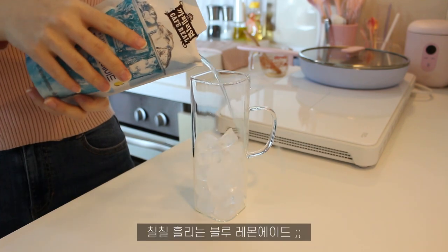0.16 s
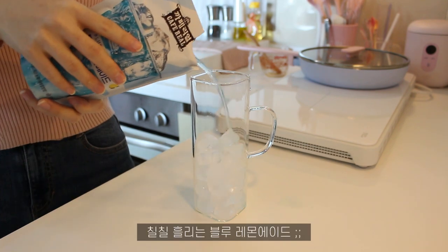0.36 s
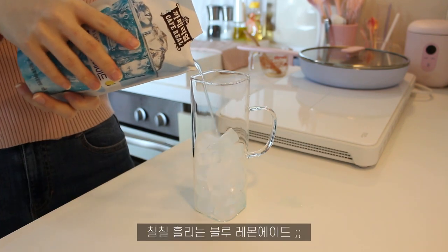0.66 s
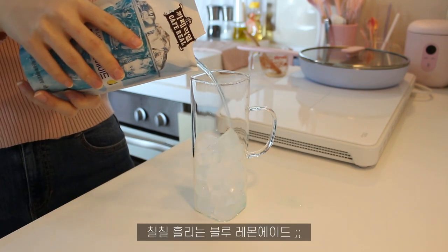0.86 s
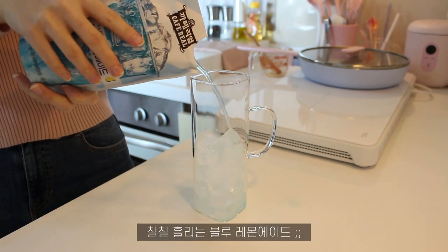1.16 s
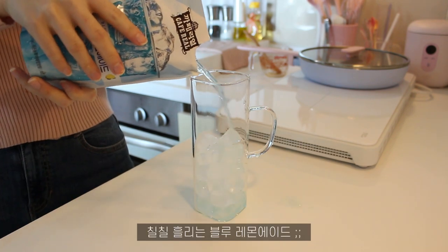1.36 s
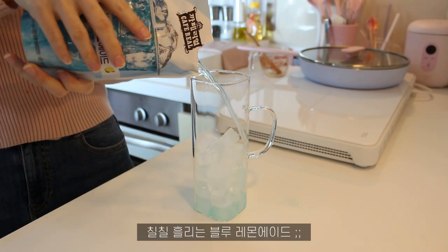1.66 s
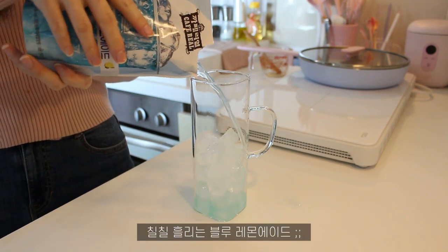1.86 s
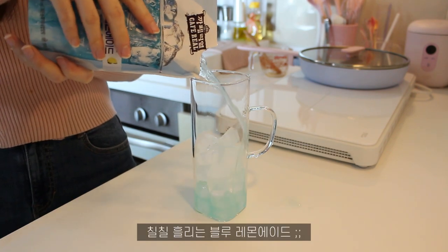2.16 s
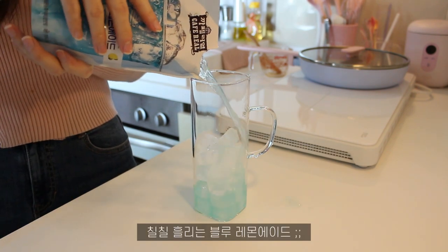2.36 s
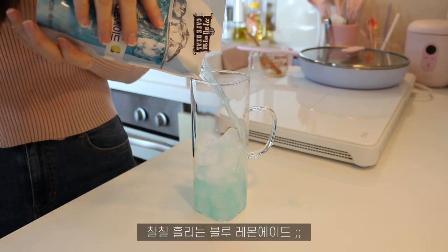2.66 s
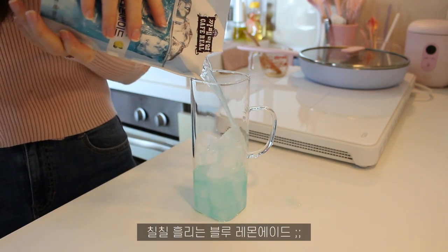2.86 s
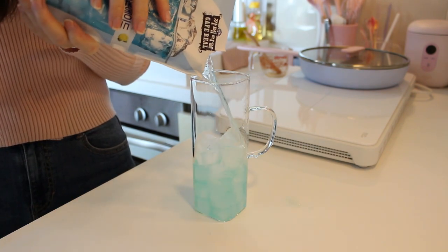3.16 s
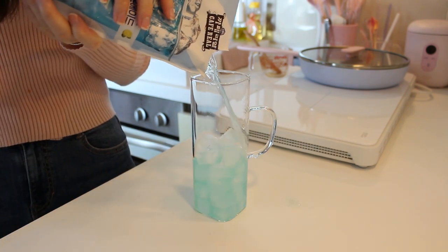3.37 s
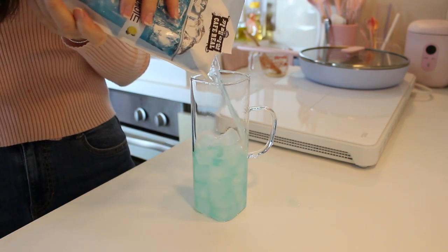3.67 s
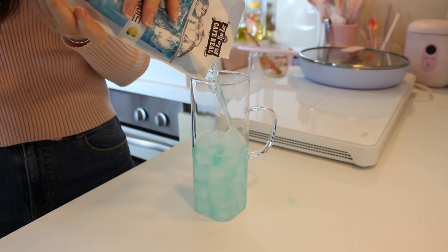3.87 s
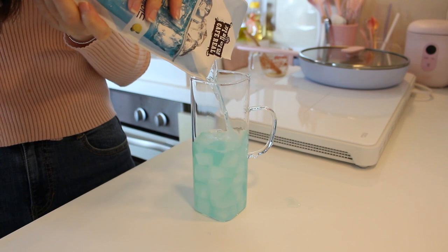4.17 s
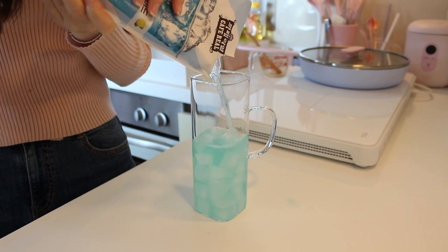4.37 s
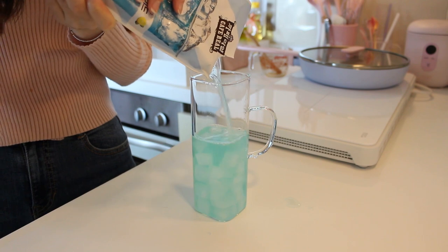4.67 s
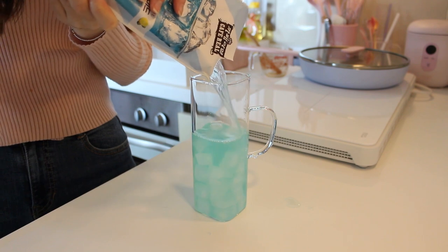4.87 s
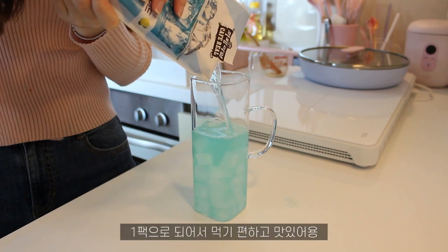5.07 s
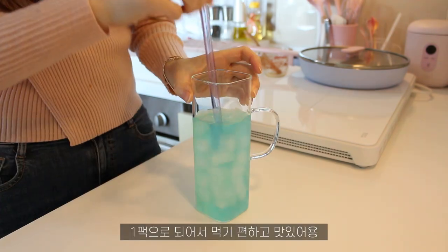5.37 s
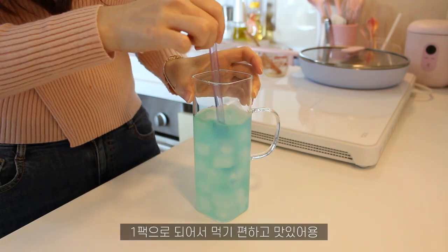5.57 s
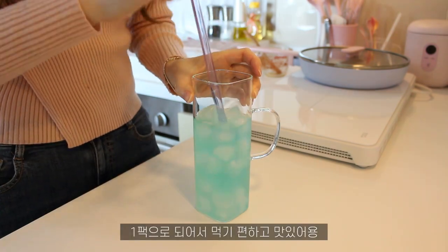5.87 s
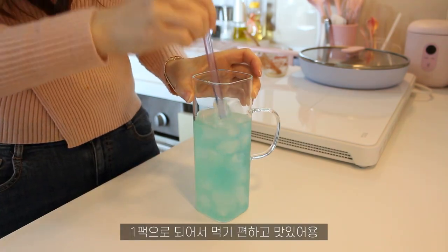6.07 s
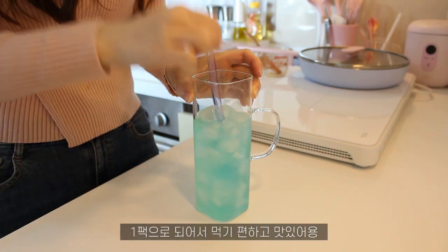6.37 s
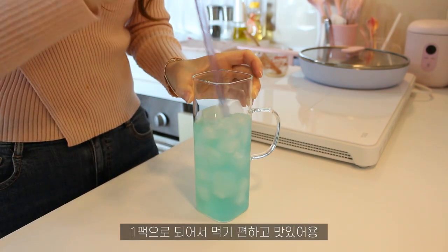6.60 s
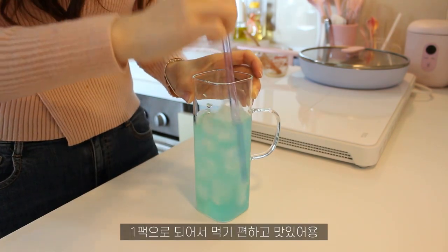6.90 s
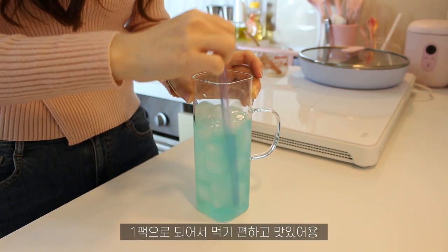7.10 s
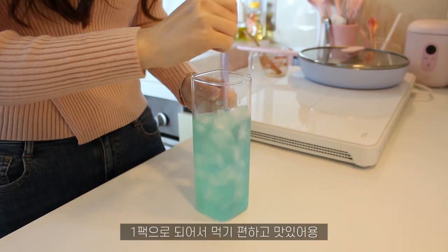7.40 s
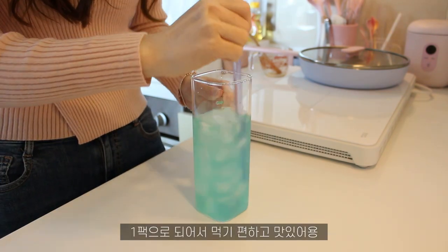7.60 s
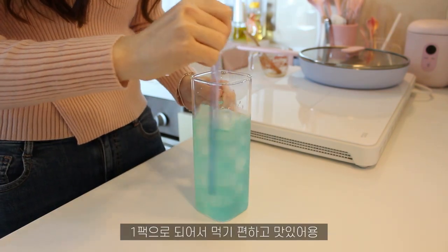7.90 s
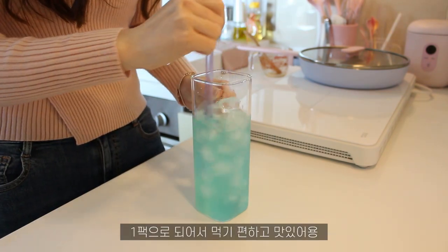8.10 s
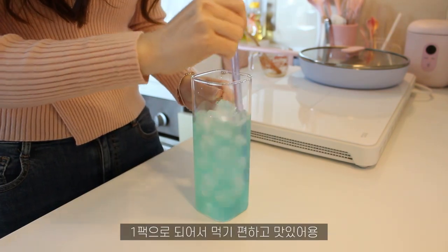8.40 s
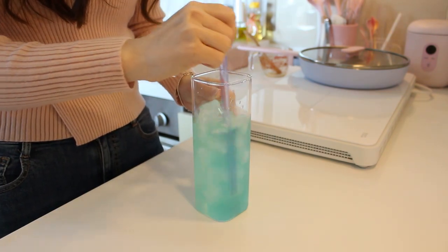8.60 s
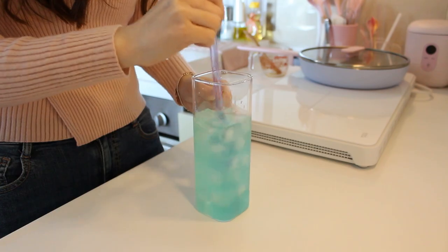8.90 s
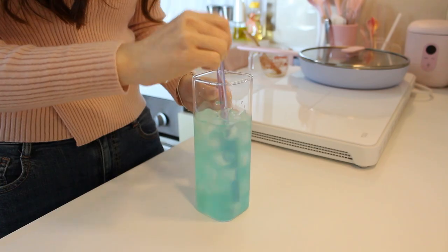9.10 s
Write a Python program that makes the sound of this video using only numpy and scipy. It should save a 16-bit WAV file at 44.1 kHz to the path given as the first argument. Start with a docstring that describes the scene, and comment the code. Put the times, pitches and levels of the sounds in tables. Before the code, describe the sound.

A close, dry kitchen sound with short reflections over a very faint room hush. From 0 to 1.5 s the pour is nearly silent, just tiny bubble plinks and soft ticks. At 1.6 s cubes clack, with a very sharp bright crack at about 1.75 s and a solid clack at 1.95 s. From 2 to 3.4 s trickling, low glugs, drips and several ice snaps cluster; another clack lands at 3.3 s. Until 4.6 s it grows quieter, with a purer gurgling hum climbing in pitch. Hard cube clacks and a last splash come at 4.7 to 5.1 s. From 5.3 s a straw pokes in separate crunchy bursts, knocking at 5.5, 6.1 and 6.3 s, with a bright ringing clink at 6.7 s and a knock at 7.0 s. From 7.25 s continuous swirling gives dense glassy clinks, grinding and light sloshing, cut abruptly near 9.2 s, leaving only hush.

```python
"""Drink poured over ice, then stirred

In a kitchen a drink is poured from a pouch over ice in a tall glass, then stirred with a straw.
Ice cracks, settles and clacks: short noise bursts ring the pieces and the decaying modes of the glass.
Bubbles plink as rising sines; noise-driven resonance of the air above the drink hums ever higher.
The straw then grinds, scrapes and knocks the cubes: filtered crackle, with blows that ring the wall.
Room echoes are noise convolutions; a faint steady room hush lies under all."""
import sys
import numpy as np
from scipy import signal
from scipy.io import wavfile

SR = 44100
rng = np.random.default_rng(int(sys.argv[2]) if len(sys.argv) > 2 else 0)


def log_audio(samples):
    """Write samples as a 16-bit WAV file to the path given in sys.argv[1]."""
    # one column per channel
    frames = np.atleast_2d(samples).T
    # limit to full scale, then quantise
    limited = np.clip(frames, -1, 1)
    pcm = np.round(limited * 32767).astype(np.int16)
    wavfile.write(sys.argv[1], SR, pcm)


N = 407925
TIME = np.arange(N) / SR

# bubbles and drips, before layer gain: start_s, level_db, pitch_hz
DRIPS = [(0.16, -43.5, 1120), (0.285, -37, 4130), (0.603, -33, 5100), (0.7178, -42.5, 2000),
         (0.721, -43, 2540), (0.954, -39, 4200), (1.0058, -42.5, 1090), (1.011, -41.5, 7200),
         (1.084, -43, 4250), (1.2, -47.5, 4220), (1.2285, -39.5, 7340), (1.265, -50, 4200),
         (1.358, -52, 2000), (1.397, -57, 1950), (1.4665, -30.5, 4900), (1.528, -44, 1950),
         (1.536, -40, 4200), (2.082, -32.5, 1170), (2.082, -36, 1910), (2.113, -46, 1140),
         (2.152, -41, 3240), (2.177, -36, 3200), (2.252, -40.5, 1870), (2.298, -28.5, 5020),
         (2.311, -32.5, 3620), (2.371, -38, 1244), (2.403, -38.5, 1274), (2.45, -46, 1480),
         (2.8505, -36.5, 2240), (2.8756, -33, 4400), (3, -31.5, 4700), (3.008, -31.5, 3690),
         (3.256, -29.5, 4260), (3.49, -44, 4000), (3.518, -48.5, 2140), (3.589, -43.5, 2300),
         (3.6596, -34.5, 2990), (3.779, -45, 2290), (3.928, -41.5, 2200), (3.957, -38, 8400),
         (4.0164, -43, 3240), (4.03, -42, 3500), (4.052, -36.5, 3800), (4.175, -42, 2510),
         (4.172, -35.5, 5300), (4.195, -38, 6420), (4.25, -57, 2500), (4.505, -43, 4060)]
# stream running over the ice, before layer gain: time_s, level_db
STREAM = [(0.0, -71), (0.32, -80), (1.49, -73), (1.65, -55), (1.75, -59.5), (2.21, -55.5), (2.62, -63.5),
          (2.86, -53), (2.97, -58), (3.11, -58), (3.24, -56), (3.87, -60.5), (4.27, -68.5), (4.66, -68),
          (4.81, -61), (4.93, -55.5), (5.06, -49.5), (5.25, -67)]
# splash spectrum under the stream: freq_hz, density_db_per_hz
SPLASH_SPECTRUM = [(400, 0.5), (1100, -9), (2200, 9.5), (4000, -1), (7000, -1.5), (11000, -15.5),
                   (16000, -37)]
# straw pushes, before layer gain: start_s, length_s, grinding_db, base_knock_db, counter_rumble_db
PUSHES = [(5.291, 0.035, -56, -44, -59), (5.493, 0.071, -37.5, -38, -48), (5.59, 0.046, -59, -49.5, -73),
          (5.794, 0.043, -40.5, -90, -67), (5.897, 0.053, -42, -56, -59), (6.017, 0.081, -54.5, -44, -52.5),
          (6.178, 0.23, -46.5, -41.5, -71), (6.491, 0.012, -51.5, -81, -62),
          (6.834, 0.047, -44.5, -51, -69), (6.894, 0.17, -39, -43, -76), (7.084, 0.13, -40.5, -54, -62),
          (7.257, 0.18, -43, -50.5, -57), (7.542, 0.18, -44.5, -54, -58), (8.01, 0.29, -44.5, -58, -65.5),
          (8.414, 0.22, -44, -55.5, -56), (8.761, 0.065, -40, -51, -57.5)]
PUSH_START_S, PUSH_LENGTH_S, PUSH_GRIND_DB, PUSH_BASE_DB, PUSH_COUNTER_DB = np.transpose(PUSHES)

TYPICAL_BLOW_DB = -41
LEVEL_WINDOW_S = 0.02   # hit levels are rms over this span
DRIP_RISE = 0.092   # phase bend; a drip's pitch climbs by twice this share over its T60
PUSH_ATTACK_S, PUSH_T60_S = 0.0037, 0.061
DIP_FROM_S, DIP_TO_S = 5.38, 7.25   # the straw dips in and out
SWIRL_FROM_S, SWIRL_TO_S, SWIRL_RISE_S, SWIRL_T60_S = 7.25, 9.08, 0.014, 1
SWIRL_GRIND_DB, SWIRL_SLOSH_DB, SWIRL_BASE_DB, SWIRL_COUNTER_DB = -46.5, -49.5, -60.5, -73


def from_db(db):
    """Decibels to amplitude."""
    return 10 ** (np.asarray(db) / 20)


def rms_one(x):
    """Scale to rms 1."""
    return x / np.sqrt(np.mean(x ** 2) + 1e-20)


def energy_one(x):
    """Scale to energy 1."""
    return x / np.sqrt(np.sum(x ** 2) + 1e-20)


def at_hz(points, hz):
    """Read a table over log frequency."""
    freq_hz, value = np.array(points).T
    return np.interp(np.log(hz), np.log(freq_hz), value)


def gain_curve(rows):
    """A level curve as a gain in time, silent outside its span."""
    time_s, db = np.transpose(rows)
    return from_db(np.interp(TIME, time_s, db, left=-np.inf, right=-np.inf))


def fade(t, t60):
    """Exponential decay, 60 dB down at t60."""
    return np.exp(-np.log(1000) * t / t60)


def swell(start, length, attack, t60):
    """Attack, hold, then a dying release."""
    t = TIME - start
    return np.clip(t / attack, 0, 1) * fade(np.maximum(t - length, 0), t60)


def drift(per_s):
    """Slow chance with a spread of about 1."""
    knots = rng.standard_normal(int(per_s * N / SR) + 2)
    return np.interp(TIME * per_s, np.arange(len(knots)), knots)


def cut(x, hz, kind, order=2):
    """Butterworth filter."""
    sos = signal.butter(order, np.minimum(hz, .47 * SR), kind, fs=SR, output="sos")
    return signal.sosfilt(sos, x + 1e-18)


def bands(lowest_hz):
    """Half-octave bands as (centre, edges)."""
    edges_hz = 22 * 2 ** np.arange(0, 9.9, .5)
    return [(np.sqrt(a * b), [a, b]) for a, b in zip(edges_hz, edges_hz[1:]) if b > lowest_hz]


def resonance(x, hz, width_hz):
    """Two-pole resonance, gain 1 on top."""
    r = np.exp(-np.pi * width_hz / SR)
    zeros = (1 - r * r) / 2 * np.array([1, 0, -1])
    poles = [1, -2 * r * np.cos(2 * np.pi * hz / SR), r * r]
    return signal.lfilter(zeros, poles, x + 1e-18)


def add(track, s, sound):
    """Mix a sound into the track at s seconds."""
    start = max(round(s * SR), 0)
    track[start:start + len(sound)] += sound[:max(N - start, 0)]


def through(x, response):
    """Convolve with an impulse response."""
    return signal.fftconvolve(x, response)[:N]


def random_clicks(per_s, spread_db):
    """Clicks of random size and sign at random moments."""
    sizes = from_db(spread_db * np.minimum(rng.exponential(1, N), 4)) * rng.choice([-1, 1], N)
    return sizes * (rng.random(N) < per_s / SR)


def crackle(spectrum, per_s, spread_db, clump_db, colour_db):
    """Ticks in clumps, each clump with a colour of its own; rms 1."""
    ticks = random_clicks(per_s, spread_db) * from_db(clump_db * np.tanh(drift(45)))
    out = np.zeros(N)
    signs = rng.choice([-1, 1], (2, N))   # neighbouring bands differ in sign pattern
    for k, (hz, edges) in enumerate(bands(300)):
        coloured = ticks * signs[k % 2] * from_db(colour_db * drift(60))
        out += from_db(at_hz(spectrum, hz)) * cut(coloured, edges, "band")
    return rms_one(out)


def bubble(hz, cycles, rise):
    """A ring of some cycles; a bubble's pitch rises as it nears the surface."""
    life = cycles / hz
    t = TIME[:int(life * SR) + 2]
    tone = np.sin(2 * np.pi * hz * t * (1 + rise * t / life))
    return tone * fade(t, life) * (1 - np.exp(-hz * t))


def swarm(spectrum, per_s, low_hz, high_hz, cycles, rise, spread_db):
    """Short rings at random moments and pitches, a few of them strong; rms 1."""
    out = np.zeros(N)
    for when, size, strength in rng.random((int(per_s * N / SR), 3)):
        hz = low_hz * (high_hz / low_hz) ** size
        gain = from_db(at_hz(spectrum, hz) + spread_db * strength ** 3)
        add(out, when * N / SR, gain * bubble(hz, cycles, rise))
    return rms_one(out)


def room_tone(level_db):
    """The faint steady hush of the room: noise shaped in bands."""
    # spectrum: freq_hz, band_gain_db
    hush_spectrum = [(15, -36), (25, -10.5), (97, -6), (249, 1), (451, -14.5), (714, -6.5), (1330, -13),
                     (4610, -20), (11900, -27), (13600, -33.5), (16000, -47)]
    white = rng.standard_normal((2, N))
    hush = np.zeros(N)
    for k, (hz, edges) in enumerate(bands(20)):
        hush += from_db(at_hz(hush_spectrum, hz)) * cut(white[k % 2], edges, "band")
    return from_db(level_db) * rms_one(hush)


def trickle(level_db):
    """Small bubbles ring where the stream runs over the cubes."""
    # bubble strength by pitch: pitch_hz, strength_db
    bubble_strength = [(600, -14.5), (1200, -6), (2200, -4), (3600, 5), (6000, -17), (12000, 1.5)]
    bubbles = swarm(bubble_strength, per_s=380, low_hz=865, high_hz=11780, cycles=100, rise=0.03,
                    spread_db=23.5)
    return from_db(level_db) * gain_curve(STREAM) * bubbles


def spatter(level_db):
    """Soft splashes of shifting colour where the stream breaks on the ice."""
    spray = crackle(SPLASH_SPECTRUM, per_s=5000, spread_db=1.5, clump_db=3, colour_db=7)
    return from_db(level_db) * gain_curve(STREAM) * spray


def ticking(level_db):
    """Tiny splinters tick between the larger cracks while the stream runs."""
    ticks = crackle(SPLASH_SPECTRUM, per_s=45, spread_db=3, clump_db=2, colour_db=6)
    return from_db(level_db) * gain_curve(STREAM) * ticks


def running_stream():
    """Bubbles, splashes and ticks; the low splashing fades as the drink covers the ice."""
    low_db, covered_from_s, low_fade_db_per_s = 3, 2.55, 18.5
    stream = trickle(level_db=-4.0) + spatter(level_db=-6.5) + ticking(level_db=-11.5)
    low_gain = from_db(low_db - low_fade_db_per_s * np.maximum(TIME - covered_from_s, 0))
    return cut(stream, 2500, "high") - low_gain * cut(stream, 940, "low")


def glass_modes(pitch):
    """One decaying sine for each mode of the wall."""
    # filled glass, before the pitch factor: freq_hz, level_db, t60_s
    glass_wall = [(1200, 9, 0.15), (2060, -11, .16), (2250, -8, 0.26), (3350, 1.5, 0.16), (3720, 7, 0.14),
                  (5740, -9.5, 0.18), (5760, -5.5, 0.34), (5920, 10, 0.092), (6700, -0.5, 0.14),
                  (8200, -6.5, 0.13)]
    t = TIME[:SR // 3]
    return np.array([from_db(db) * np.sin(2 * np.pi * hz * pitch * t) * fade(t, t60)
                     for hz, db, t60 in glass_wall])


def ice_hits(rows, pitch, snap, crumble_t60, chips_db, note_db, note_q, thump_hz, thump_t60, ring_db):
    """Each hit snaps, crumbles and sheds chips in its band; it thumps the base and rings the wall."""
    snap_t60_s, contact_rise_s = 0.01, 0.00051   # brief chatter; wet ice takes a moment to bear
    note_loss_per_db = 0.22   # a hard blow holds the piece and damps its note
    out, t, modes = np.zeros(N), TIME[:SR // 4], glass_modes(pitch)
    span = np.sqrt(LEVEL_WINDOW_S * SR)
    for s, db, low_hz, high_hz, note_hz, thump_db, wall_db in rows:
        grains = rng.random(len(t)) < 600 / SR
        chips = energy_one(rng.standard_normal(len(t)) * grains * fade(t, 0.27))
        crumble = energy_one(rng.standard_normal(len(t)) * fade(t, crumble_t60))
        first = energy_one(rng.choice([-1, 1], len(t)) * fade(t, snap_t60_s))
        force = crumble + from_db(chips_db) * chips
        force += first * snap * np.sqrt(1500 / low_hz)   # big pieces knock, small ones splinter
        force *= np.clip(t / contact_rise_s, 0, 1)
        held_db = note_loss_per_db * max(db - TYPICAL_BLOW_DB, 0)
        force += from_db(note_db - held_db) * resonance(force, note_hz, note_hz / note_q)
        force += from_db(-1.0) * resonance(force, 950, 130)   # damped lowest mode of the glass
        wall = from_db(1.9 * rng.standard_normal(len(modes))) @ modes   # each spot favours other modes
        for sound, level_db in ((force, db), (wall, db + wall_db + ring_db)):
            banded = cut(cut(sound, low_hz, "high", order=3), high_hz, "low", order=3)
            add(out, s, span * from_db(level_db) * energy_one(banded))
        base_hz = thump_hz * np.exp(.06 * rng.standard_normal())
        thump = np.sin(2 * np.pi * base_hz * t) * fade(t, thump_t60)
        thump = energy_one(cut(thump, [160, 800], "band", order=3))
        add(out, s, span * from_db(thump_db) * thump)
    return out


def with_ring(blows, ring_db):
    """Append glass ring re the blow; a harder blow presses the cubes on the wall and damps it."""
    loss_per_db = 2
    return [(s, db, *rest, ring_db - loss_per_db * max(db - TYPICAL_BLOW_DB, 0))
            for s, db, *rest in blows]


def settle_hits():
    """Blunt blows of cubes settling as they float free."""
    # before layer gain: start_s, level_db, low_edge_hz, high_edge_hz, piece_note_hz, thump_db
    settles = [(0.1578, -50.5, 600, 650, 760, -70), (0.2871, -51.5, 272, 6800, 506, -66),
               (1.324, -48.5, 810, 825, 1200, -53.5), (1.934, -47.5, 900, 3040, 1060, -75),
               (2.0802, -48, 880, 3700, 1150, -59), (2.7263, -40, 1047, 1060, 1200, -61),
               (2.745, -56, 600, 1500, 845, -54), (2.766, -49.5, 900, 3060, 2340, -57),
               (2.9551, -35, 710, 4330, 2360, -66), (3.022, -61, 700, 2190, 1090, -63),
               (3.061, -49, 600, 1440, 1140, -57.5), (3.2945, -34, 970, 2580, 2260, -75),
               (3.602, -55.5, 503, 1560, 1167, -64)]
    return with_ring(settles, ring_db=-26.5)


def plinks(cycles, splash_db, splash_t60, onset_s, level_db):
    """Drips: a rising bubble swells in softly, inside a small splash of about the same pitch."""
    out, t = np.zeros(N), TIME[:SR // 8]
    for s, db, hz in DRIPS:
        tone = from_db(db + level_db) * bubble(hz, cycles, rise=DRIP_RISE)
        tone = tone * np.clip(TIME[:len(tone)] / onset_s, 0, 1)
        noise = rng.standard_normal(len(t)) * fade(t, splash_t60)
        splash = energy_one(cut(noise, [hz * 0.92, hz * 1.13], "band", order=4))
        add(out, s, tone)
        add(out, s, from_db(splash_db) * np.linalg.norm(tone) * splash)
    return out


def droplets(cycles, count=2):
    """Each drip throws up droplets that fall back just after it, as small bubbles near its pitch."""
    droplet_db, within_s = -13, .06   # level re the drip table
    out = np.zeros(N)
    for s, db, hz in DRIPS:
        for when, size in rng.random((count, 2)):
            ring = bubble(hz * (.7 + .4 * size), cycles, DRIP_RISE)
            add(out, s + when * within_s, from_db(db + droplet_db) * ring)
    return out


def gurgling():
    """Each gurgle is a smooth bump on the faint hum of the stream."""
    # before layer gain: middle_s, length_s, level_db
    gurgles = [(0.301, 0.042, -54), (1.028, 0.042, -57), (1.207, 0.048, -62.5), (2.99, 0.17, -50.5),
               (3.126, 0.077, -51), (3.212, 0.045, -63), (3.703, 0.063, -47), (3.786, 0.055, -49),
               (3.876, 0.022, -58), (4.035, 0.045, -58), (4.188, 0.049, -50), (4.267, 0.01, -46.5),
               (4.397, 0.047, -49.5), (4.584, 0.02, -63.5)]
    hum_from_s, hum_to_s, hum_db, hum_fade_s = 1.8, 5.3, -73.5, 0.12
    bumps = sum(from_db(db) * np.exp(-(2 * (TIME - s) / length) ** 2) for s, length, db in gurgles)
    return bumps + from_db(hum_db) * swell(hum_from_s, hum_to_s - hum_from_s, hum_fade_s, hum_fade_s)


def air_column(damped_width_hz, clear_width_hz, evenness, burst_db, overtone_db, level_db):
    """Bubbling excites the quarter-wave note of the shrinking air space, and faintly its third harmonic."""
    # resonance rising as the glass fills: time_s, pitch_hz
    air_pitch = [(0, 509.6), (1.3, 552.4), (2.502, 660), (3, 744.4), (3.7, 776), (4.04, 780), (4.18, 826),
                 (4.401, 851), (4.799, 899)]
    clear_from_s, clear_takes_s = 3.4, 0.63   # purer as the drink covers the ice that blurs it
    time_s, hz = np.transpose(air_pitch)
    phase = 2 * np.pi * np.cumsum(np.interp(TIME, time_s, hz)) / SR
    bubbling = rng.standard_normal(N) + 1j * rng.standard_normal(N)
    bubbling = bubbling * from_db(burst_db * drift(50))
    clear = np.clip((TIME - clear_from_s) / clear_takes_s, 0, 1)
    damped_swing = cut(bubbling, damped_width_hz, "low") / np.sqrt(damped_width_hz)
    clear_swing = cut(bubbling, clear_width_hz, "low") / np.sqrt(clear_width_hz)
    swing = (1 - clear) * damped_swing + clear * clear_swing
    size = np.abs(swing)
    swing = swing / (size + 0.27 * size.mean()) ** min(evenness, 1)   # evens out the level
    note = rms_one(np.real(swing * np.exp(1j * phase)))
    overtone = rms_one(np.real(cut(bubbling, 3 * clear_width_hz, "low") * np.exp(3j * phase)))
    return from_db(level_db) * gurgling() * (note + from_db(overtone_db) * overtone)


def crack_hits():
    """Bright cracks as the drink warms the ice; smaller splinters lift both band edges."""
    # before layer gain: start_s, level_db, low_edge_hz, piece_note_hz
    cracks = [(0.5116, -64.5, 2600, 10100), (0.832, -63, 6330, 7200), (1.372, -68, 3410, 12450),
              (1.568, -44, 1210, 4320), (1.7604, -23.5, 3600, 6520), (2.2214, -35.5, 2900, 3400),
              (2.23, -42.5, 3100, 4460), (2.6717, -40, 2100, 3900), (2.7875, -49.5, 3630, 3700),
              (2.9115, -29, 1580, 3620), (3.1072, -37, 2380, 3760), (3.1651, -32, 5270, 7650),
              (3.377, -34.5, 2750, 3700), (3.5645, -42, 3430, 9000), (3.695, -32.5, 3600, 3520),
              (3.722, -39.5, 2140, 3950), (4.407, -41.5, 4060, 9500), (4.5768, -33.5, 4730, 5800),
              (5.062, -51.5, 5500, 6350), (4.7202, -31, 2920, 6860)]
    typical_low_hz, typical_top_hz, top_follows = 2990, 12100, 0.11
    thump_db, ring_db = -47, -18.5   # re the crack, before layer gain
    rows = []
    for s, db, low_hz, note_hz in cracks:
        top_hz = typical_top_hz * (low_hz / typical_low_hz) ** top_follows
        rows.append((s, db, low_hz, top_hz, note_hz, db + thump_db, ring_db))
    return rows


def glugs(level_db):
    """Larger pockets of air ring low as the stream traps them between the bare cubes."""
    # pocket strength by pitch: pitch_hz, strength_db
    pocket_strength = [(600, -9), (800, -10.5), (1050, -3), (1270, 10), (1600, -9), (1950, 12), (2400, -16),
                       (3200, -11)]
    # churning between bare cubes and after one has tipped, before layer gain: time_s, level_db
    churn = [(1.59, -8), (1.66, -1), (1.78, -8), (1.9, -22), (1.98, -3.5), (2.1, -8), (2.2, -8), (2.37, -4),
             (2.47, 0), (2.63, -13), (2.76, -7), (2.86, -18), (3.05, -9), (3.17, -20)]
    pockets = swarm(pocket_strength, per_s=400, low_hz=600, high_hz=3200, cycles=46, rise=0.053,
                    spread_db=9)
    return from_db(level_db) * gain_curve(churn) * pockets


def clacks(chatter_db, chatter_t60, wash_db, wash_t60, note_q, spreading, thump_hz, thump_t60,
           level_db, count=10):
    """A tipping cube's clean contact rings it and the damped wall; it chatters, then drink washes back."""
    # before layer gain: start_s, level_db, low_edge_hz, high_edge_hz, cube_note_hz, note_db, thump_db
    blows = [(1.5956, -32.5, 390, 3670, 2980, -4.5, -45), (1.941, -25, 896, 3400, 3200, -9, -43),
             (2.515, -34, 590, 3200, 720, -1, -61), (3.3097, -27.5, 451, 12800, 806, 4, -54),
             (4.7262, -26, 1350, 8390, 5760, 0, -74.5), (4.8055, -19, 1300, 4400, 1790, 11, -74),
             (4.8911, -27, 770, 847, 850, 1, -40), (4.9475, -21, 623, 5200, 5350, -8.5, -46.5),
             (6.2814, -31, 800, 5560, 1160, 14.5, -56), (6.318, -21, 910, 5500, 3400, -7.5, -41.5),
             (7.0142, -27.5, 850, 6900, 1910, 5, -45.5)]
    # damped wall with a cube pressed against it: freq_hz, width_hz, level_db
    pressed_wall = [(1072, 200, -0.8), (1490, 76, -1.0), (1965, 610, -3), (2537, 340, -2),
                    (3430, 550, -6.5), (4710, 440, -6), (4940, 320, -6.1), (10033, 8300, -8.5)]
    out, t = np.zeros(N), TIME[:SR // 4]
    span = np.sqrt(LEVEL_WINDOW_S * SR) * from_db(level_db)
    lag = np.clip(spreading, 0, .85)
    for s, db, low_hz, high_hz, note_hz, note_db, thump_db in blows:
        chatter = energy_one(rng.standard_normal(len(t)) * fade(t, chatter_t60))
        grains = rng.random(len(t)) < 900 / SR
        wash = energy_one(rng.standard_normal(len(t)) * grains * fade(t, wash_t60))
        wash_gain = from_db(wash_db - .4 * (db - TYPICAL_BLOW_DB))
        force = (t == 0) + from_db(chatter_db) * chatter + wash_gain * wash
        for _ in range(count):   # low bending waves travel slower, which spreads the click
            force = signal.lfilter([-lag, 1], [1, -lag], force + 1e-18)
        body = from_db(note_db) * resonance(force, note_hz, note_hz / note_q)
        for k, (hz, width_hz, mode_db) in enumerate(pressed_wall):
            body += (-1) ** k * from_db(mode_db) * resonance(force, hz, width_hz)
        body = cut(cut(body, low_hz, "high", order=4), high_hz, "low", order=3)
        thump = np.sin(2 * np.pi * thump_hz * t) * fade(t, thump_t60)
        thump = cut(thump, [150, 600], "band", order=3)
        add(out, s, span * from_db(db) * energy_one(body))
        add(out, s, span * from_db(thump_db) * energy_one(thump))
    return out


def stirring(levels_db, t60, swirl_db):
    """Each push swells and dies away, on top of the drifting and then swirling contents."""
    # cubes drifting while the straw dips, twice coming to rest: time_s, level_re_swirl_db
    drift_levels = [(5.38, -21.5), (5.46, -10.5), (5.64, -26), (5.68, -40), (5.78, -42), (5.8, -12),
                    (6.55, -24.5), (6.68, -15.5), (6.75, -7), (7.25, -34)]
    pushes = sum((from_db(db) * swell(s, length, PUSH_ATTACK_S, t60)) ** 2
                 for s, length, db in zip(PUSH_START_S, PUSH_LENGTH_S, levels_db))
    drifting = from_db(swirl_db) * gain_curve(drift_levels)
    # stirred in circles, the contents keep turning between pushes
    swirl = swell(SWIRL_FROM_S, SWIRL_TO_S - SWIRL_FROM_S, SWIRL_RISE_S, SWIRL_T60_S)
    return np.sqrt(pushes + drifting ** 2 + (from_db(swirl_db) * swirl) ** 2)


def grinding(ring_db, tick_db, note_db, level_db):
    """Cubes rub and tick on each other, some with a brief note, and keep the wall faintly ringing."""
    # spectrum: freq_hz, density_db_per_hz
    grind_spectrum = [(400, -8.5), (750, -34), (1100, 5), (1550, -14), (2200, 4), (2800, 1.5), (3400, 5.5),
                      (4400, 6.5), (6200, -8.5), (8800, -11), (12000, -19.5), (16000, -73.5)]
    # broad resonances of the full glass under rubbing ice: freq_hz, width_hz, level_db
    glass_body = [(915, 290, 12.5), (2360, 64, 1), (3266, 116, 8), (6060, 240, 10.5), (7100, 290, 8.5)]
    rub = crackle(grind_spectrum, per_s=1300, spread_db=2.5, clump_db=4.5, colour_db=1.5)
    ticks = crackle(grind_spectrum, per_s=59, spread_db=3, clump_db=3, colour_db=11.0)
    ticks = cut(ticks, 1800, "high")
    notes = swarm(grind_spectrum, per_s=540, low_hz=1968, high_hz=7670, cycles=120, rise=0,
                  spread_db=9.5)
    ice = rub + from_db(tick_db) * ticks + from_db(note_db) * notes
    body = sum(from_db(db) * resonance(ice, hz, width_hz) for hz, width_hz, db in glass_body)
    ice = rms_one(ice + body)
    ice = from_db(level_db) * stirring(PUSH_GRIND_DB, PUSH_T60_S, SWIRL_GRIND_DB) * ice
    return ice + from_db(ring_db) * through(ice, energy_one(glass_modes(0.93).sum(axis=0)))


def sloshing(level_db):
    """The drink follows each push and laps between the moving cubes."""
    # spectrum: freq_hz, density_db_per_hz
    slosh_spectrum = [(400, -3.5), (750, 0.5), (1100, -15), (1800, 6.5), (3000, 13.5), (6000, -56),
                      (16000, -42.5)]
    slosh_db, slosh_t60_s = -22.5, .18   # re the grinding table, before layer gain
    motion = stirring(PUSH_GRIND_DB + slosh_db, slosh_t60_s, SWIRL_SLOSH_DB)
    laps = crackle(slosh_spectrum, per_s=470, spread_db=-0.5, clump_db=-2.5, colour_db=3.0)
    return from_db(level_db) * motion * laps


def rumble(base_db, counter_db):
    """Jostling cubes sound the hollow note of the base and shake the counter."""
    base_t60_s, counter_t60_s = 0.15, 0.35
    base = rms_one(cut(random_clicks(300, 0.42), [280, 385], "band"))
    counter = rms_one(cut(random_clicks(370, 0.75), [105, 200], "band", order=4))
    base = base * stirring(PUSH_BASE_DB, base_t60_s, SWIRL_BASE_DB)
    counter = counter * stirring(PUSH_COUNTER_DB, counter_t60_s, SWIRL_COUNTER_DB)
    return from_db(base_db) * base + from_db(counter_db) * counter


def light_touches(level_db, spread_db, low_hz, high_hz, ring_db, count=36):
    """Lighter clinks at random moments, their level following the stirring."""
    effort = stirring(PUSH_GRIND_DB, PUSH_T60_S, SWIRL_GRIND_DB)
    rows = []
    for when, strength, size in rng.random((count, 3)):
        s = DIP_FROM_S + when * (SWIRL_TO_S - DIP_FROM_S)
        effort_db = 20 * np.log10(effort[min(int(s * SR), N - 1)] + 1e-9)
        db = effort_db + level_db + spread_db * strength
        rows.append((s, db, high_hz, low_hz * (high_hz / low_hz) ** size, ring_db))
    return rows


def stir_hits():
    """Blunt knocks against the base, thin clinks against the wall."""
    # knocked by the straw, before layer gain:
    # start_s, level_db, low_edge_hz, high_edge_hz, piece_note_hz, thump_db
    knocks = [(5.293, -52.5, 903, 4500, 3400, -62), (5.312, -44.5, 333, 1000, 522, -32),
              (5.331, -54, 330, 994, 570, -45), (5.358, -63, 327, 1000, 450, -46),
              (5.478, -49.5, 1000, 3000, 1250, -70), (5.4973, -37.5, 814, 4350, 1230, -58),
              (5.512, -34, 597, 4300, 1120, -34), (5.5254, -31.5, 750, 3540, 3380, -39.5),
              (5.553, -48, 650, 4500, 1090, -55), (5.5605, -30.5, 800, 5640, 3400, -38),
              (5.585, -39, 790, 3970, 2400, -57), (5.609, -41.5, 690, 3200, 1130, -66),
              (5.623, -40, 690, 3200, 1090, -55), (5.733, -62.5, 1080, 3590, 3400, -84.5),
              (5.8287, -36, 2960, 2960, 2510, -69), (5.912, -36, 2740, 2670, 2520, -58),
              (6.0645, -45.5, 760, 2950, 964, -39), (6.1884, -28, 1220, 4600, 3330, -39),
              (6.2173, -29, 2170, 3800, 3900, -63), (6.2393, -32, 1000, 4770, 3290, -38),
              (6.301, -42, 900, 3200, 1160, -52), (6.405, -43.5, 950, 3650, 2060, -50),
              (6.8145, -34.5, 1880, 4900, 4440, -65), (6.877, -41, 1890, 3500, 2550, -62),
              (6.9087, -31, 1990, 7400, 2540, -47.5), (6.9577, -29.5, 1360, 5370, 1104, -45),
              (7.0534, -33.5, 2350, 3300, 2290, -42.5), (7.091, -36, 1900, 3670, 2740, -54),
              (7.1217, -33.5, 1040, 4300, 2580, -48.5), (7.1445, -36.5, 1030, 3200, 1120, -55),
              (7.7291, -39.5, 1266, 7100, 3350, -53), (8.8101, -38.5, 1440, 4440, 3930, -54)]
    # cubes on the wall, before layer gain: start_s, level_db, high_edge_hz, piece_note_hz, ring_re_level_db
    wall_clinks = [(5.8045, -47, 5030, 4650, -14), (5.8443, -38.5, 5900, 3390, -23),
                   (5.8954, -40.5, 7440, 4600, -21), (5.942, -49.5, 6530, 4200, -21),
                   (6.115, -41, 6900, 6070, -18), (6.1225, -24, 8200, 6360, -5),
                   (6.1255, -26.5, 7900, 5200, -17), (6.1735, -42, 6200, 4870, -20),
                   (6.258, -39, 6500, 3240, -13), (6.5566, -56, 5900, 3100, -23),
                   (6.6244, -51.5, 6900, 5000, -28), (6.6464, -46.5, 3670, 3240, -31),
                   (6.718, -20.5, 11600, 5700, -19), (6.7347, -35, 9620, 3600, -15),
                   (6.9425, -39, 7800, 5200, -18), (7.177, -41, 5930, 2630, -16),
                   (7.2027, -42.5, 5200, 5200, -17), (7.2652, -38.5, 6700, 3180, -5),
                   (7.2922, -40.5, 8000, 6260, -13), (7.3071, -37, 7500, 3500, -3),
                   (7.3354, -31, 5770, 5600, 1.5), (7.3495, -31.5, 5600, 3630, -2),
                   (7.361, -42, 6000, 4340, -4), (7.3894, -39, 6270, 5700, -15),
                   (7.4204, -39, 5500, 3240, -17), (7.4365, -37.5, 7800, 6460, -16),
                   (7.447, -37, 7300, 7200, -3), (7.4658, -34.5, 6370, 3420, -9),
                   (7.5576, -38.5, 8000, 7300, -13), (7.6139, -37.5, 7300, 3200, -15),
                   (7.632, -30.5, 7800, 6150, -14), (7.6395, -40, 6540, 6000, -17),
                   (7.6724, -28.5, 6100, 5940, -4.5), (7.741, -38, 6550, 3200, -18),
                   (7.7717, -36, 7450, 3270, -19), (7.8444, -43.5, 6000, 3360, -15),
                   (7.8649, -53, 5530, 3300, -15), (7.9159, -37.5, 4900, 2660, -16),
                   (7.9477, -40, 5330, 4670, -15), (7.9613, -29.5, 8300, 3200, -30),
                   (8.0424, -37.5, 6800, 2760, -1), (8.0702, -33.5, 5900, 5700, -19),
                   (8.1088, -36, 6700, 3500, -19), (8.1727, -57, 5480, 2660, -15),
                   (8.1918, -34.5, 4900, 3550, -5), (8.208, -36.5, 6200, 5900, -6),
                   (8.2146, -42, 6000, 3170, -15), (8.2475, -36.5, 5760, 4600, -1),
                   (8.3602, -43, 5750, 3200, -17), (8.3907, -45, 5500, 3220, -12),
                   (8.4198, -34.5, 5440, 4440, -27), (8.4381, -36, 6340, 4650, -14),
                   (8.4695, -35.5, 5900, 3980, -1), (8.5169, -42, 6900, 3330, -15),
                   (8.5458, -49, 6900, 3960, -15), (8.568, -40, 7000, 7200, -18),
                   (8.604, -42, 7000, 6600, -16), (8.5822, -43, 7000, 3100, -24),
                   (8.6895, -43.5, 7200, 3540, -15), (8.7054, -37, 6400, 6000, -24),
                   (8.7469, -45, 5000, 3980, -17), (8.7705, -34.5, 5630, 4180, -28),
                   (8.7962, -38, 5000, 3950, -20), (8.8915, -41.5, 5860, 3320, -3),
                   (8.9803, -52, 6960, 2080, -18), (8.996, -30.5, 6320, 5870, -29),
                   (9.095, -40, 5970, 4500, 1.5), (9.147, -48, 5000, 4100, -10)]
    centre_hz, thump_db = 4180, -34   # band spreads both ways from the centre; thump re the clink
    touches = wall_clinks + light_touches(level_db=-7, spread_db=0.5, low_hz=2220, high_hz=6340,
                                          ring_db=-4.5)
    clinks = [(s, db, centre_hz ** 2 / high_hz, high_hz, note_hz, db + thump_db, ring_db)
              for s, db, high_hz, note_hz, ring_db in touches]
    return clinks + with_ring(knocks, ring_db=-12.5)


def scraping(level_db):
    """Pushed down, the straw scrapes through the packed cubes, as hard as it knocks the base."""
    # spectrum: freq_hz, density_db_per_hz
    scrape_spectrum = [(400, -1), (650, -10), (1050, 5), (1500, 1), (2300, 2), (3300, -3), (5000, -21),
                       (9000, -28), (16000, -54.5)]
    push = stirring(PUSH_BASE_DB, PUSH_T60_S, SWIRL_BASE_DB)
    push = push * swell(DIP_FROM_S, DIP_TO_S - DIP_FROM_S, SWIRL_RISE_S, PUSH_T60_S)
    scrape = crackle(scrape_spectrum, per_s=350, spread_db=1.0, clump_db=1, colour_db=2.5)
    return from_db(level_db) * push * scrape


def rim_and_thuds():
    """The bare wall rings with beating, wandering modes; the counter gives a short low thud."""
    # bare wall above the drink, in close groups: freq_hz, level_db, t60_s
    rim_modes = [(1180, -7, 0.12), (3390, 0.5, 0.23), (3400, -0.5, 0.18), (3540, -2.5, .25),
                 (3620, 0.5, 0.35), (3640, -7, 0.28), (5080, -10, 0.54), (5049, -5, 0.41), (5180, -1, .24),
                 (5350, -6, 0.18), (5590, -13, 0.17), (6000, -4, 0.074), (6800, -7, 0.15),
                 (7000, 0.5, 0.11), (7045, -3, 0.34)]
    # hard clinks on the bare wall: start_s, level_db
    rim_strikes = [(6.7187, -31.5), (6.7347, -40)]
    # blows driving the glass onto the counter: start_s, level_db
    counter_blows = [(6.3185, -53), (7.0151, -57), (7.262, -62)]
    blur_hz, thud_hz, thud_t60_s = 70, 45, 0.099
    out, t = np.zeros(N), TIME[:SR // 2]
    steps = rng.standard_normal((len(rim_modes), len(t)))
    wander = np.cumsum(steps, axis=1) * np.sqrt(2 * np.pi * blur_hz / SR)
    ring = np.zeros(len(t))
    for (hz, db, t60), phase in zip(rim_modes, wander):
        mode = np.sin(2 * np.pi * hz * t + phase) * fade(t, t60)
        ring += from_db(db) * mode * rng.choice([-1, 1])
    ring = cut(ring, 900, "high")
    thud = cut(np.sin(2 * np.pi * thud_hz * t) * fade(t, thud_t60_s), 200, "low")
    for rows, sound in ((rim_strikes, ring), (counter_blows, thud)):
        for s, db in rows:
            add(out, s, from_db(db) * sound)
    return out


def kitchen(x, early_db, early_t60, late_db, count=5):
    """Early counter reflections, then a tail shorter in the treble; echo patterns shift with the spot."""
    # reverberation: freq_hz, t60_s
    kitchen_decay = [(150, 0.31), (500, 0.3), (1500, 0.29), (4000, 0.24), (8000, 0.25), (15000, 0.027)]
    t, out = TIME[:SR * 3 // 4], x.copy()
    spots = np.array([drift(25) for _ in range(count)])
    for share in spots / np.linalg.norm(spots, axis=0):
        white = rng.standard_normal((3, len(t)))
        early = energy_one(white[2] * fade(t, early_t60) * (t > .0035))
        late = np.zeros(len(t))
        for k, (hz, edges) in enumerate(bands(60)):
            late += cut(white[k % 2], edges, "band") * fade(t, at_hz(kitchen_decay, hz))
        late = energy_one(late * np.clip(t / 0.0093 - .5, 0, 1))
        out += through(x * share, from_db(early_db) * early + from_db(late_db) * late)
    return out


def scene():
    """Pour, then stir, in the kitchen over room tone."""
    pour = running_stream()
    pour += ice_hits(settle_hits(), pitch=0.97, snap=0.45, crumble_t60=0.041, chips_db=-10.5,
                     note_db=2.0, note_q=14.0, thump_hz=303, thump_t60=0.031, ring_db=3.5)
    pour += plinks(cycles=62, splash_db=-5, splash_t60=.07, onset_s=0.0017, level_db=2.0)
    pour += droplets(cycles=55)
    pour += air_column(damped_width_hz=70, clear_width_hz=42.0, evenness=0.72, burst_db=5.5,
                       overtone_db=-15.5, level_db=-2.0)
    pour += from_db(1.8) * ice_hits(
        crack_hits(), pitch=0.97, snap=0.5, crumble_t60=0.027, chips_db=-12.5,
        note_db=6.0, note_q=9.2, thump_hz=301, thump_t60=0.033, ring_db=4)
    pour += glugs(level_db=-53.0)
    blows = clacks(chatter_db=-7, chatter_t60=0.047, wash_db=-10.5, wash_t60=0.31, note_q=6.6,
                   spreading=.5, thump_hz=328, thump_t60=0.028, level_db=-0.5)
    stir = grinding(ring_db=-27.5, tick_db=-2.0, note_db=1.5, level_db=-2.0)
    stir += sloshing(level_db=-6.5) + rumble(base_db=-11.5, counter_db=-4.5)
    stir += from_db(-3.0) * ice_hits(
        stir_hits(), pitch=0.98, snap=0.45, crumble_t60=0.028, chips_db=-17.0,
        note_db=13.0, note_q=22.5, thump_hz=329.3, thump_t60=0.059, ring_db=-4.5)
    stir += scraping(level_db=-6.5) + rim_and_thuds()
    heard = kitchen(pour + blows + stir, early_db=-5.5, early_t60=0.073, late_db=-14.5)
    cut_off_s = 9.195   # the sound of the glass and its echoes is cut off here; only room hush stays
    heard *= fade(np.maximum(TIME - cut_off_s, 0), 0.0085)
    return (heard + room_tone(level_db=-71))[None]


def record(dry):
    """The top is cut steeply above 16.2 kHz."""
    return signal.sosfilt(signal.ellip(10, .2, 80, 16200, fs=SR, output="sos"), dry)


dry = scene()
out = record(dry)
log_audio(out)
```